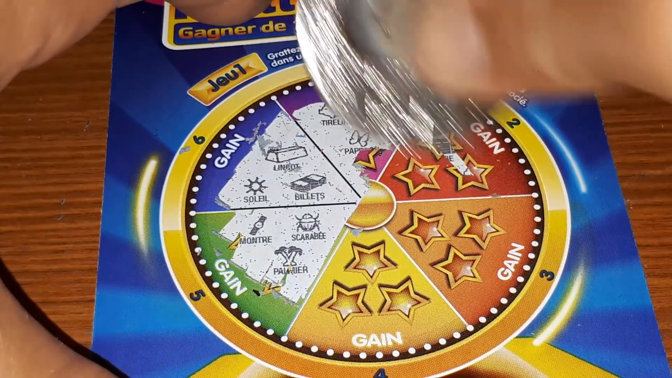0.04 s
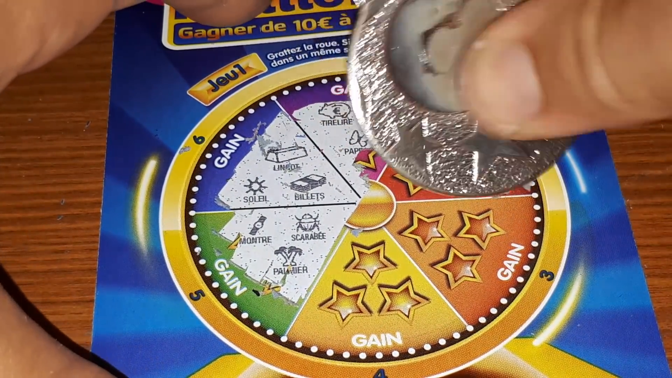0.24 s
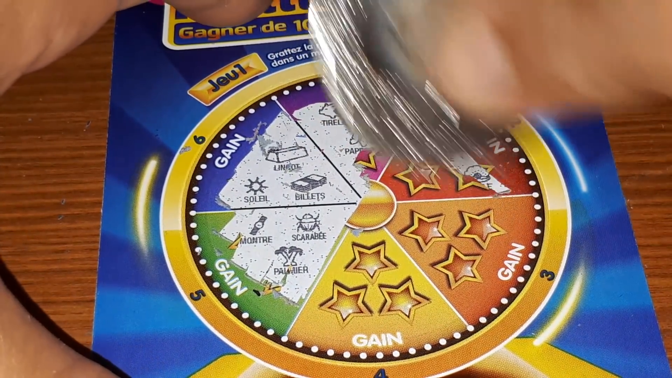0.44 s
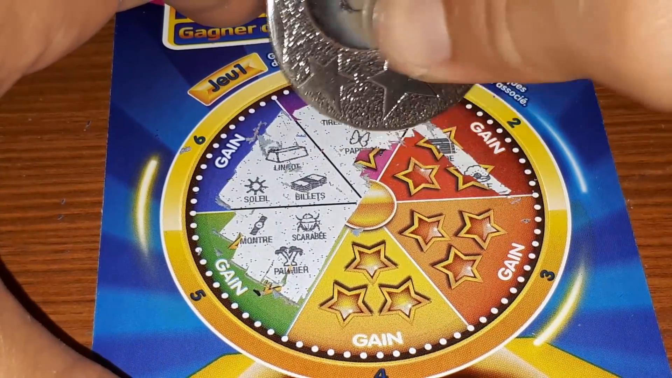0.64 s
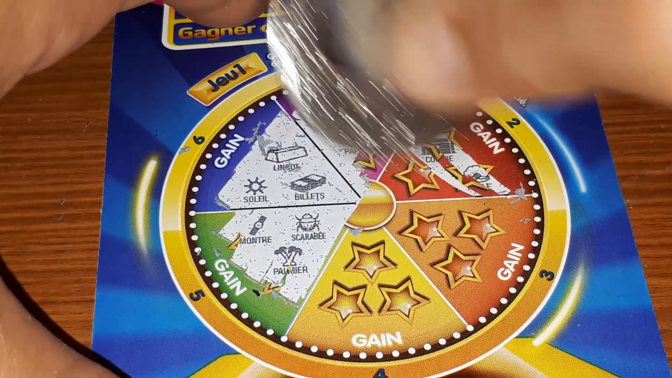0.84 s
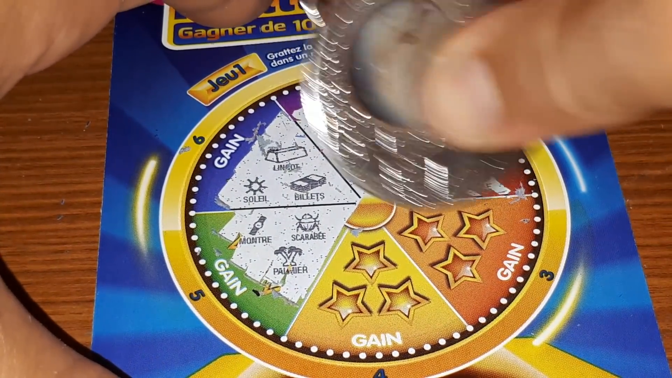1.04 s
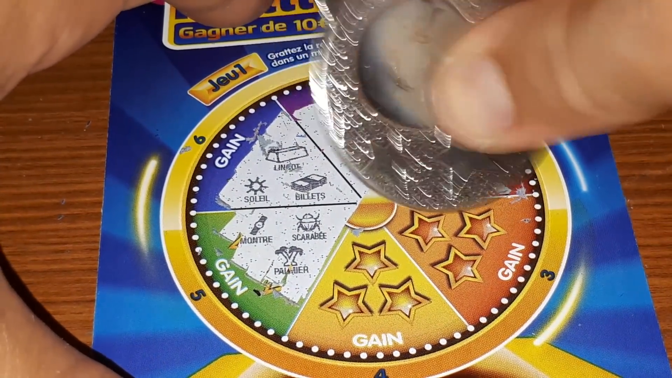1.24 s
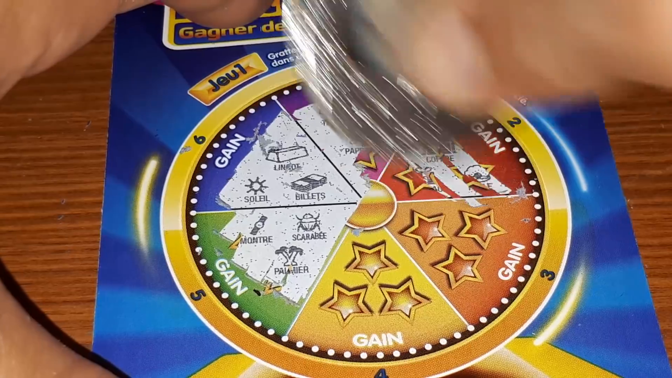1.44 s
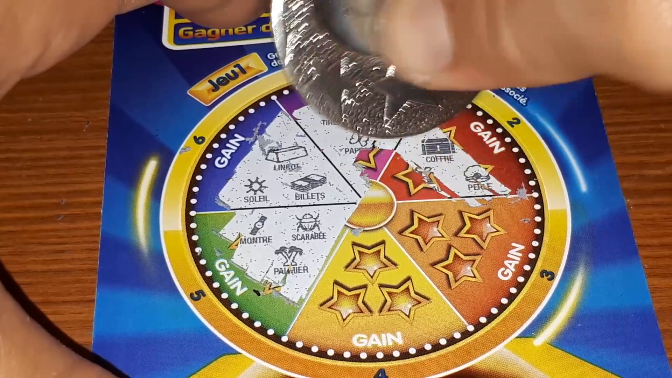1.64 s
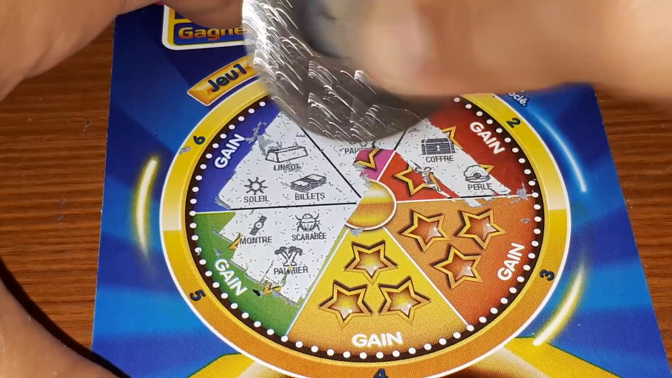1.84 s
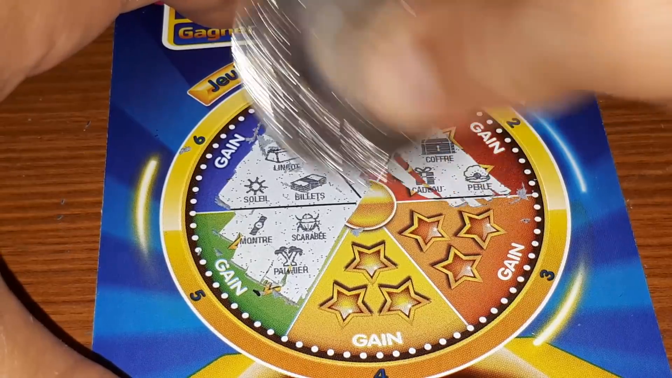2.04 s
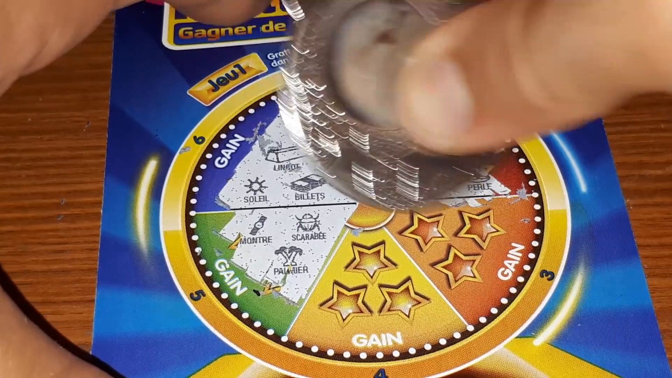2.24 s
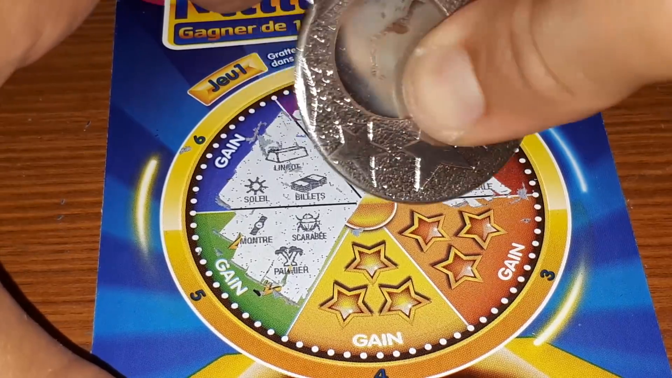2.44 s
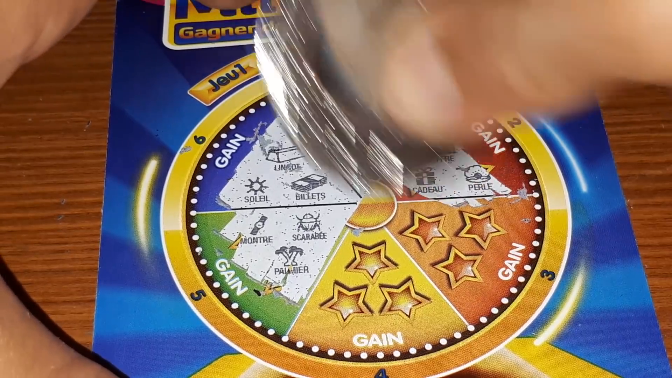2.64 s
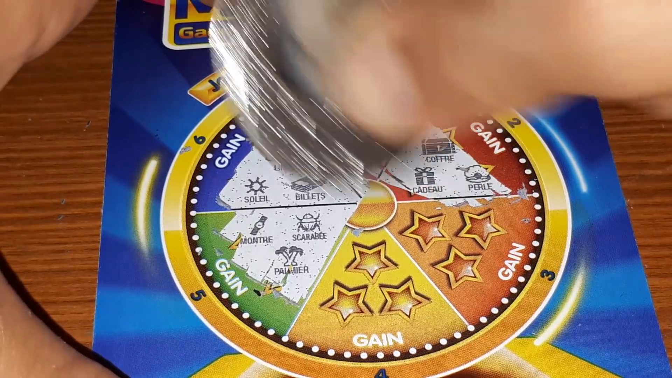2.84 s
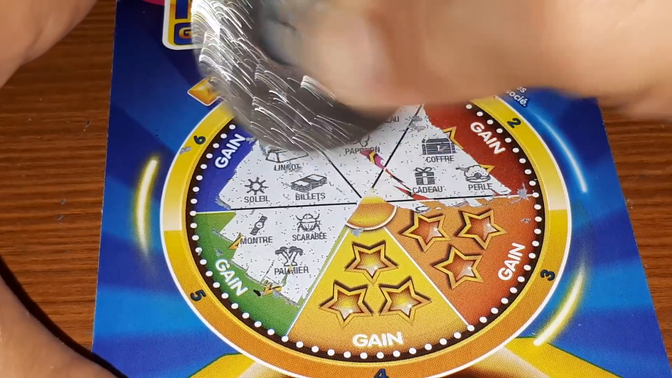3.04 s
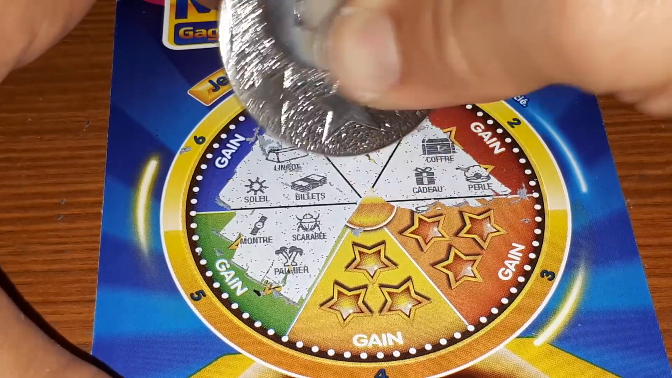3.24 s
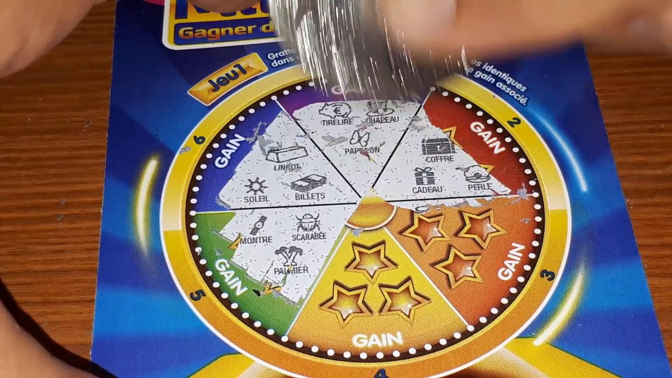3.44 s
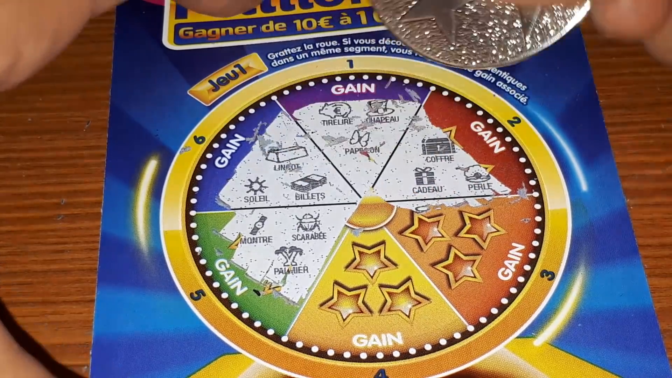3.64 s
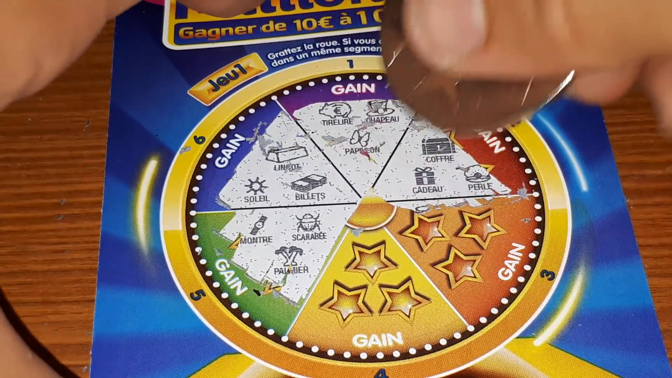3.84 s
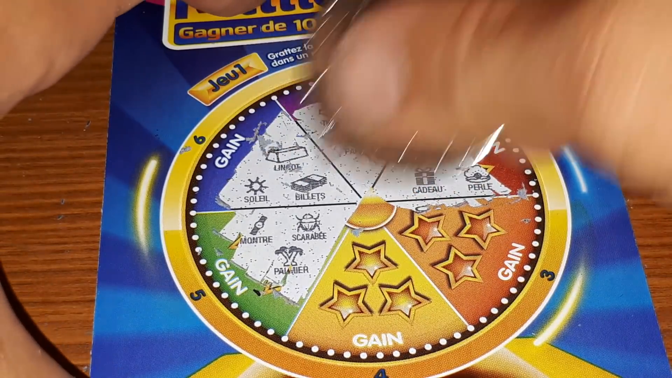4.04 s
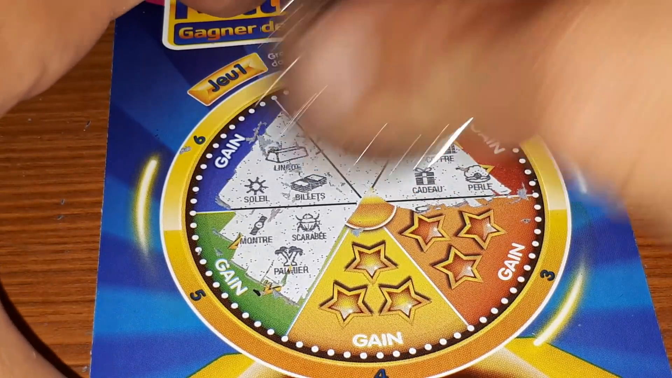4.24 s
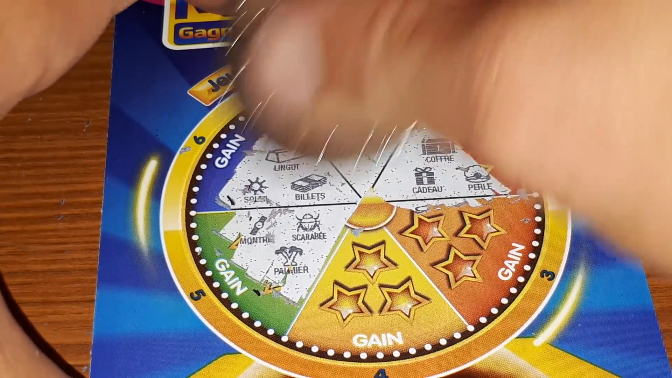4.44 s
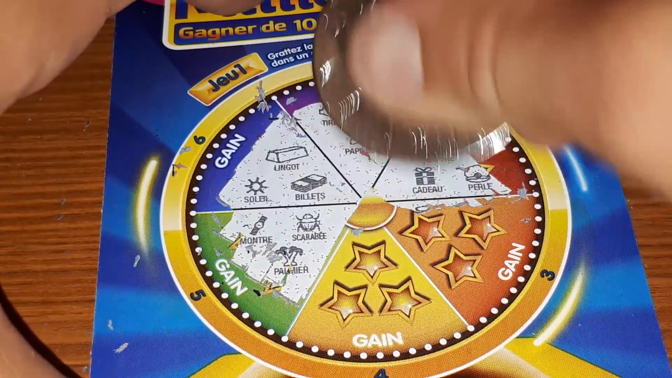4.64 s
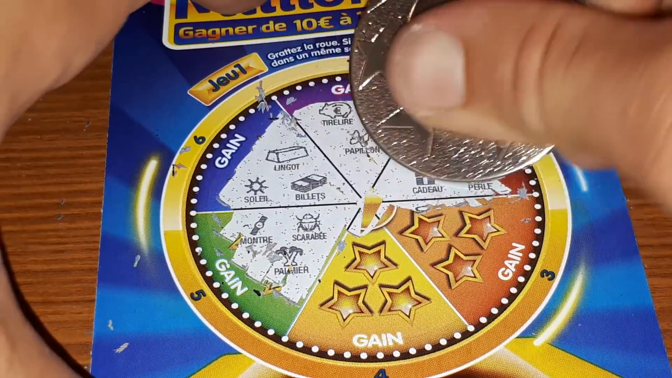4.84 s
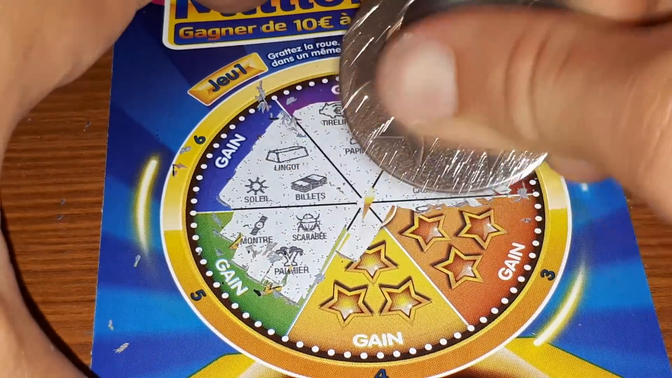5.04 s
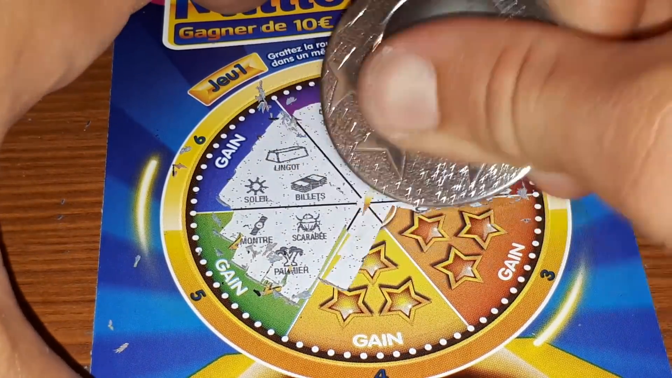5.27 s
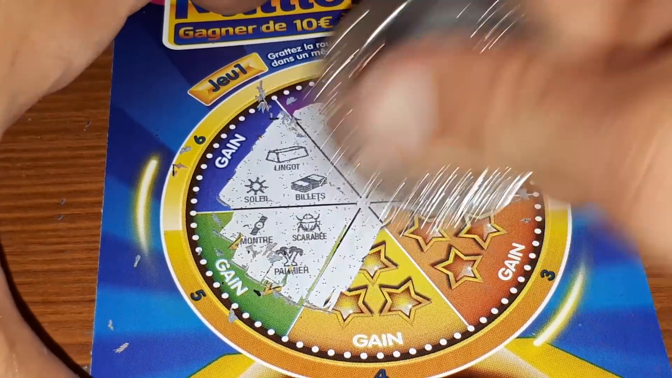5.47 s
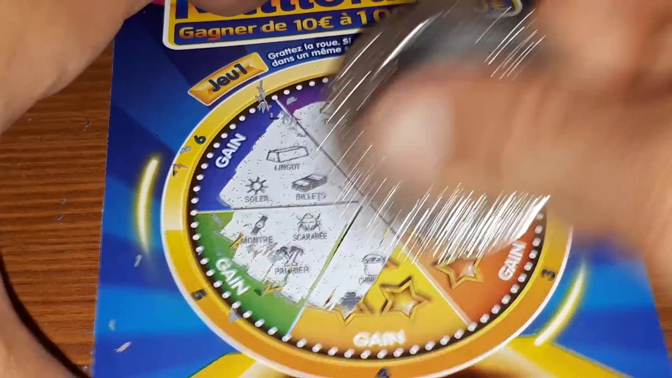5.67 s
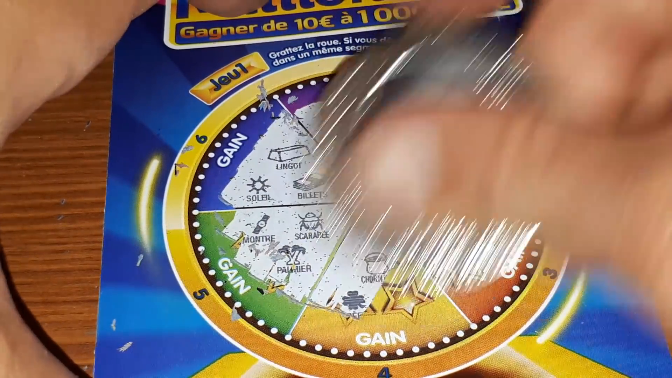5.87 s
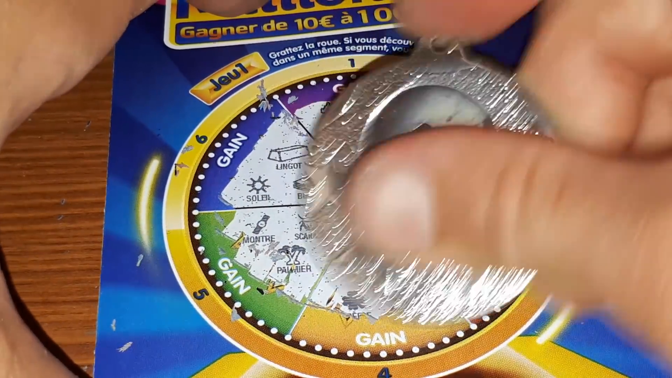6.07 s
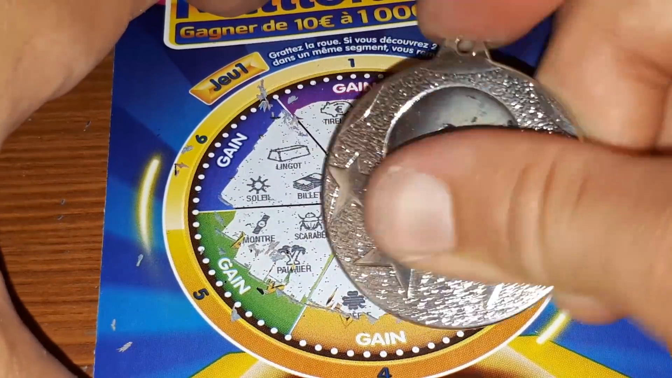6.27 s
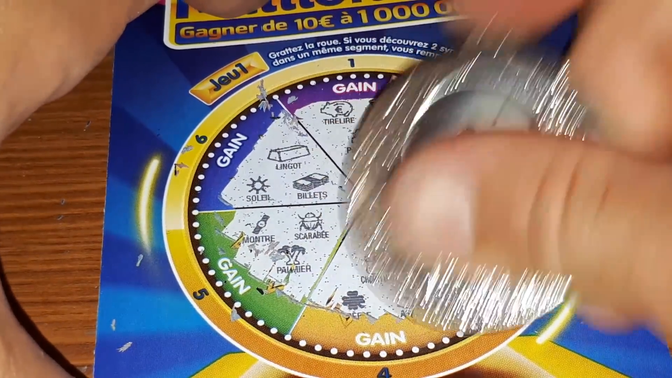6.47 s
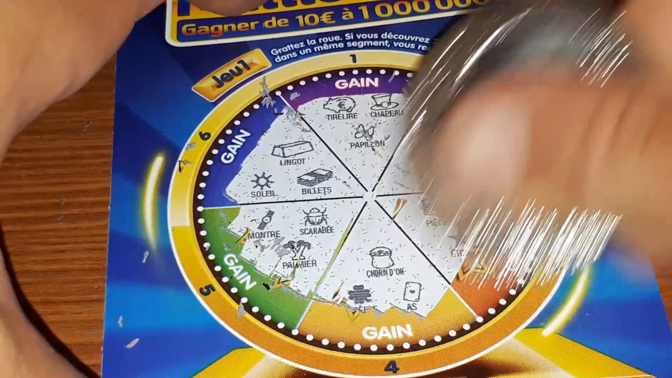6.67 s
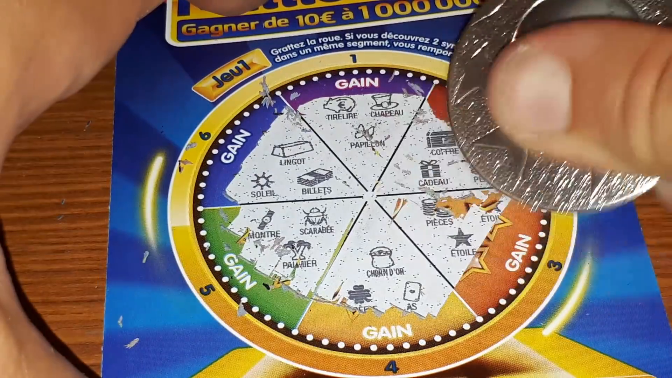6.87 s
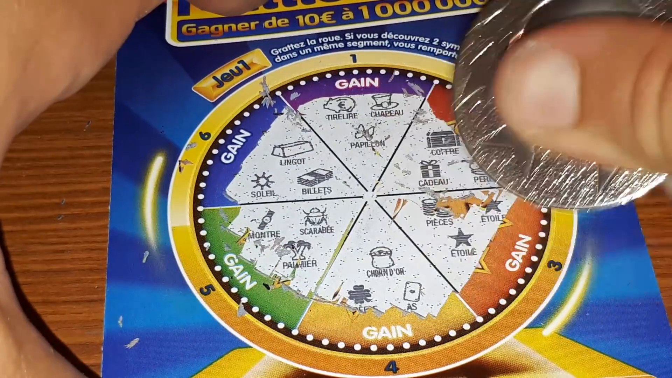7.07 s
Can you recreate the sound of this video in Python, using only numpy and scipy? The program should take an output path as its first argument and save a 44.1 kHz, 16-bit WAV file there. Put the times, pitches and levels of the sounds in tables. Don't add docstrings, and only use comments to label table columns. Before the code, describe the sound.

Rapid, regular coin scratching on a paper ticket: heavier, woodier pushes answer thinner, brighter pulls, with small clacks and crackles as the rim skips and flakes tear. After a short near-silent gap holding a faint tick and a solid knock on the table, strokes return, first duller, then crisper and more grating. Recorded very close in stereo, in a quiet room with faint low rumble.

```python
import sys
import numpy as np
from scipy import signal
from scipy.fft import rfft, irfft, next_fast_len
from scipy.io import wavfile
from scipy.ndimage import uniform_filter1d

SR = 44100
rng = np.random.default_rng(int(sys.argv[2]) if len(sys.argv) > 2 else 0)


def nominal_scale(level):
    x = np.asarray(level, float) / 20
    return 10 ** x


def pcm_store(signal):
    levels = np.round(np.clip(np.atleast_2d(signal), -1, 1) * 32767)
    wavfile.write(sys.argv[1], SR, levels.astype(np.int16).T)


N = 313551

# pitch_hz, level_db (per Hz)
HUSH = [(18, -44), (30, -14), (86, 0), (233, -12), (287, 1), (415, -18), (962, -19), (1390, -22),
        (8740, -32), (14800, -28.5), (16000, -31)]
# pitch_hz, side_minus_mid_db
WIDE = [(60, -7), (110, -27.5), (200, -28), (380, -20), (700, -16), (1290, -12.5), (2380, -5.5), (4400, -8),
        (8120, -5.5), (15000, -6)]
# pitch_hz, left_minus_right_db
LEAN = [(60, 1.0), (110, 1.0), (200, 0.5), (380, 0.5), (700, 1.5), (1290, .3), (2380, 1.0), (4400, 3.7),
        (8120, 2.5), (15000, 3.0)]

# pitch_hz, width_hz, far_level_db, near_level_db (far and near part of the ticket)
TABLE_MODES = [(92.6, 66, -8.5, -7.5), (130, 10.4, -8.5, -7), (164.3, 43, -3.5, 1), (198, 24, -4.5, 0.5),
               (220, 80, -4, -2), (294, 19.4, -1, -1), (332, 29, -4.5, -3), (418, 65, -4.5, -7),
               (475.8, 21.4, -3.5, -4), (561.4, 30, -3.5, -3.5), (617, 62, -8.5, -3), (676, 33, -5, 0.5),
               (737, 26.5, -6.5, -3.5)]
CARD_MODES = [(790, 46, -33, -18.5), (874.7, 28.8, -3, -7.5), (896.4, 91, 1, -1.5), (970.3, 57.4, 0, 0.5),
              (1030.5, 56, -1.5, 1), (1073.4, 80, -6, -1.5), (1117, 32, -21.5, -9.5), (1210, 79, -14, -9.5),
              (1264, 100, -18, -14), (1460, 51.3, -21.5, -19), (1472, 130, -23, -12.5),
              (1597.4, 58, -12.5, -12)]
PAPER_MODES = [(1790, 260, -9, -1.5), (1925, 58, -2.5, -3.5), (2119, 29, -8, -10.5), (2230, 52, -5.5, -8.5),
               (2240, 120, -3, -4), (2560, 360, -6, -3.5), (2820, 86, -9, -1), (2914, 52, -10, -6),
               (3227, 83, -9, -8.5), (3520, 360, -10, -5.5)]
COIN_MODES = [(3950, 240, -3, -10), (4140, 105, 8, -5), (4846, 145, -1.5, -10.5), (4530, 160, -6, -9)]
FIZZ_MODES = [(5160, 2300, 4, 10.5), (6500, 1350, -1.5, 4), (7740, 660, -2.5, 1), (8620, 1660, -18, -10)]
HISS_MODES = [(9376, 280, -3, 1.5), (10850, 800, -8, -8), (12020, 730, -8.5, 0.5), (14100, 1500, -5, -5),
              (15700, 1600, -13.5, 1.5)]
# pitch_hz, width_hz, level_db
THUD_MODES = [(146, 25, -3.5), (287, 34, 1.5), (325, 32, -2.5), (470, 20, -6.5), (636, 17, -15),
              (706, 24, -19), (906, 43, -3), (1030, 92, -18), (1106, 29, -18), (1586, 48, -14),
              (2200, 400, -51)]
# pitch_hz, width_hz, level_db
TICK_MODES = [(800, 250, -0.5), (1600, 200, -7.5), (2110, 270, -7), (2800, 24, 1.5), (2970, 10, 4.5),
              (3080, 70, 1), (3600, 250, -9)]

# time_s, level_db
WRIST_ROCK = [(0.0, -45), (0.2, -56), (0.65, -42), (0.77, -52), (1.39, -50), (1.78, -62), (1.94, -49),
              (2.47, -50.5), (3.01, -45.5), (3.46, -57), (3.8, -89.5), (4.12, -72), (5.07, -51),
              (5.52, -56.5), (5.9, -46.5), (6.3, -62), (6.65, -49.5), (7.11, -64)]
# start_s, level_db
LANDING = (3.943, -24)
# start_s, peak_db
FLAKES = [(0.1979, -50), (2.0727, -37), (2.7884, -39), (3.0184, -45), (3.225, -39), (4.293, -43),
          (4.5121, -46.5), (5.2834, -62), (5.3884, -36), (5.4545, -42), (.8604, -36), (1.1079, -40),
          (2.0627, -41), (2.7761, -37), (2.8729, -41), (4.7137, -46), (5.3617, -43), (5.5822, -43),
          (5.6875, -37), (6.0217, -42), (6.3555, -41), (6.57, -42)]
# start_s, peak_db, brightness_db
SNAGS = [(0.475, -45, -16), (0.992, -30, -15.5), (1.376, -18.5, -25), (1.486, -31, -19), (1.853, -38, -16),
         (2.641, -36, -21), (3.023, -29, -24), (5.134, -29, -12), (5.386, -27.5, -17), (5.949, -14, -16),
         (6.485, -28.5, -15), (6.617, -17, -14), (6.851, -13, -6.5)]
# start_s, peak_db, wood_db
JOLTS = [(0.179, -33, 0), (0.475, -28, -7), (0.721, -26.5, -6), (0.745, -23, -3), (0.991, -29, -1),
         (1.244, -30, -13), (1.261, -25, 0), (1.361, -23.5, -19), (1.376, -22.5, -25), (1.486, -24, -8),
         (1.6, -27, -12), (1.84, -28, -20), (1.853, -20, -20), (1.935, -29, -5), (2.23, -36, 4),
         (2.334, -26, -14), (2.41, -31, -3), (2.423, -27, -5), (2.566, -27, -13), (2.643, -31, 11),
         (2.675, -27.5, -5), (2.863, -30, -1.5), (2.875, -27, -4), (3.023, -25.5, -15), (3.085, -26.5, -7),
         (3.206, -27, -15), (4.49, -26, -14), (4.505, -25, -10), (4.693, -32, -15), (4.707, -26, -15),
         (4.815, -29, -26), (4.906, -25, -14), (5.134, -23, -15), (5.145, -21.5, -16), (5.354, -24.5, -17),
         (5.385, -22, -14), (5.566, -27, -17), (5.894, -30, -20), (6.015, -28, -12), (6.484, -24, -23),
         (6.955, -28, -7), (7.04, -31, -17)]

# start_s, length_s, pressure_db, coating_bite_db, bite_lag_ms
PUSH_FAR = [(0.188, 0.058, -41.5, -50, 6.5), (0.467, 0.049, -31.5, -58.5, -2),
            (0.732, 0.041, -32.5, -62, 2), (0.984, 0.033, -35.5, -60.5, 4),
            (1.236, 0.038, -32.3, -62.5, 11), (1.474, 0.038, -31.5, -64, 6), (1.706, 0.048, -36.5, -67, 8),
            (1.93, 0.054, -36, -53, 12), (2.168, 0.059, -39, -58.5, 1), (2.415, 0.042, -33.5, -64.5, 2),
            (2.651, 0.047, -33.6, -66, 2), (2.865, 0.044, -36, -49.5, 3.5), (3.085, 0.039, -34, -53, 8),
            (3.303, 0.067, -44, -69.5, 19)]
PULL_FAR = [(0.036, 0.06, -39.5, -54.5, 12.5), (0.316, 0.06, -38, -55.5, 2), (0.582, 0.048, -33, -57.5, 8),
            (0.839, 0.057, -36.5, -46.5, 10.5), (1.092, 0.059, -38.5, -48.5, 6),
            (1.353, 0.044, -31, -53, 2.5), (1.587, 0.039, -35, -53.5, 4), (1.839, 0.029, -27.5, -63.5, 13),
            (2.056, 0.044, -35.5, -44.5, 4), (2.297, 0.045, -32.5, -53, 2),
            (2.545, 0.036, -31.5, -59.5, -1), (2.758, 0.043, -35, -46.2, 10), (2.98, 0.053, -36.5, -49, -4),
            (3.199, 0.035, -36, -52.5, 5)]
PUSH_NEAR = [(4.038, 0.046, -40.5, -66.5, 11), (4.252, 0.052, -35.5, -63, 0),
             (4.47, 0.044, -32.9, -64.5, 16), (4.689, 0.041, -36, -55.5, 24),
             (4.9, 0.051, -33.5, -49.5, 16.5), (5.127, 0.04, -31, -47, 20.5),
             (5.347, 0.042, -30.5, -47.1, 15.5), (5.568, 0.041, -31.3, -48, 18),
             (5.785, 0.054, -35.5, -49.8, 7), (6.001, 0.067, -39.5, -48.1, 4),
             (6.236, 0.051, -38, -49, 2.5), (6.466, 0.041, -35.5, -49.5, 8.5),
             (6.69, 0.057, -36, -60.5, 15), (6.931, 0.049, -37.0, -55.1, 6)]
PULL_NEAR = [(4.149, 0.043, -43.5, -83, 2), (4.368, 0.049, -44.5, -80.5, 8), (4.576, 0.048, -34, -70, 12),
             (4.792, 0.04, -36.5, -50.5, -0.5), (5.021, 0.044, -38.5, -49.5, 1),
             (5.255, 0.04, -34.5, -62, 10), (5.468, 0.048, -33.5, -60.2, -12),
             (5.678, 0.061, -39.5, -44.5, -4.5), (5.885, 0.064, -37, -48, 12.5),
             (6.116, 0.071, -38.5, -44.5, 4), (6.347, 0.07, -40, -47, -2), (6.572, 0.067, -40, -45.0, 2),
             (6.801, 0.061, -35.5, -45.0, 14), (7.039, 0.068, -36.5, -50.5, 1.5)]
WOOD_DB = [
    (.4, -0.5, -0.9, 1.5, -1.5, -0.7, -1, -0.2, 1.9, -0.11, .1, -1.5, .1, 0.5),
    (-.4, -0.5, 0.7, -.8, 3, -4, -.1, -0.5, -1.6, .4, -2, -1.9, -2, -3),
    (0.73, -0.6, -1.2, -1.5, -1.1, 0, 1, 0, -1.4, .6, 1.8, -1.8, -2.6, 2.5),
    (-1.1, 4, -2, -4.6, .1, 1, -0.5, 0.5, -.8, -.1, -2.5, 0.078, -0.5, 2),
]
# push_far_db, pull_far_db, push_near_db, pull_near_db
TABLE_DB = (-33.4, -45, -38.5, -50.5)
COIN_DB = (-53, -52.5, -56.5, -52)
RASP_DB = (-51.5, -55, -52.5, -54)
# far_db_per_db, near_db_per_db
COIN_PER_BITE = (1, 1.09)
RASP_PER_BITE = (0.85, 0.92)
# push_far_s, pull_far_s, push_near_s, pull_near_s
TABLE_MORE_S = (.03, .034, .026, .06)
TABLE_LAG_S = (-.011, .003, -0.0046, 0.0046)
# far_10db, near_10db
# and far_s, near_s
SWELL_TENS_DB = (-0.14, 0.2)
SWELL_EARLY_S = (-0.00087, 0.0038)
# far_db, near_db
FIZZ_DB = (-1.5, -0.95)
HISS_DB = (-3, -5.5)

MOVE_S = 4.3
TICK_S, TICK_DB = 3.647, -53


def evened(x):
    return x / np.sqrt(np.mean(x ** 2) + 1e-20)


def coloured(x, points, share=1):
    curve_hz, curve_db = np.transpose(points)
    size = next_fast_len(N)
    hz = np.fft.rfftfreq(size, 1 / SR)
    db = np.interp(np.log(hz + 1), np.log(curve_hz + 1), curve_db)
    return irfft(rfft(x, size) * nominal_scale(share * db))[..., :N]


def swings(modes, drift):
    hz, width = np.transpose(modes)[:2, :, None]
    t = np.arange(min(6144, round(2.5 * SR / width.min()))) / SR
    hz = hz * (1 + drift * rng.standard_normal(hz.shape))
    decay = np.sqrt(width) * np.exp(-np.pi * width * t)
    onset = 1 - np.exp(-t / 0.00017)
    return decay * np.sin(2 * np.pi * hz * t) * onset


def blend(db, tones):
    return nominal_scale(db) * (-1) ** np.arange(len(tones)) @ tones


def body(force, modes, vary_db, wander_s, drift=0.011):
    tunings = [swings(modes, drift) for _ in range(4)]
    step = max(round(wander_s * SR), 1000)
    out = np.zeros((2, N + 6143))
    chance = rng.standard_normal((N // 1000 + 1, len(modes)))
    for k, a in enumerate(range(0, N, step)):
        place_db = np.transpose(modes)[2 + (a > MOVE_S * SR)]
        h = blend(place_db + vary_db * chance[k], tunings[k % 4])
        part = signal.fftconvolve(force[:, a:a + step], h[None] / np.linalg.norm(h), axes=1)
        out[:, a:a + part.shape[1]] += part
    return out[:, :N]


def knocks(times, dbs, modes, rattle_s, lead=0):
    out, t = np.zeros((2, N + 900)), np.arange(900) / SR
    for s, db in zip(times, dbs):
        rattle = (rng.standard_normal(900) + lead * (t == 0)) * np.exp(-t / rattle_s)
        ring = blend([m[-1] for m in modes], swings(modes, 0.0036))
        h = np.convolve(ring, rattle)[:6144]
        part = out[:, round(s * SR):][:, :len(h)]
        part += nominal_scale(db) * (h / abs(h).max())[:part.shape[1]]
    return out[:, :N]


def hush():
    a, b = rng.standard_normal((2, N))
    return nominal_scale(-69) * evened(coloured(np.array([a + .3 * b, a - .3 * b]), HUSH))


def rumble():
    busy = (abs(np.arange(N) / SR - 3.7) > .25) * 0.65 + 0.28
    band = signal.butter(2, [25, 90], "band", fs=SR, output="sos")
    low = signal.sosfilt(band, rng.standard_normal((2, N)))
    shake = evened(low[0] + .12 * low * [[0], [1]])
    return nominal_scale(-77.5) * shake * uniform_filter1d(busy, 4000)


def room(x):
    t60_s, first_s = .33, .006
    t = np.arange(SR // 2) / SR
    taps = rng.choice([-1., 1.], (2, len(t))) * (rng.random((2, len(t))) < .05) * (t > first_s)
    taps = taps * nominal_scale(-60 * t / t60_s)
    return signal.oaconvolve(x[None], taps / np.linalg.norm(taps[0]), axes=1)[:, :N]


def fingernail_tick():
    snap = knocks([TICK_S - .001], [TICK_DB - 5], FIZZ_MODES + HISS_MODES, 0.0013)
    return snap + knocks([TICK_S], [TICK_DB], TICK_MODES, .002)


def landing():
    s, db = LANDING
    wood = knocks([s, s + .006, s + .013], [db + 2.0, db + 2.0, db - 2.5], THUD_MODES, 0.0014, 9.4)
    snap = knocks([s - .001], [db - 26], FIZZ_MODES + HISS_MODES, 0.0013)
    return wood + snap + knocks([s], [db - 35], PAPER_MODES + COIN_MODES, .003)


def flakes():
    s, db = np.transpose(FLAKES)
    return knocks(s, db - 2.5, FIZZ_MODES + HISS_MODES, 0.0046)


def snags():
    s, db, bright_db = np.transpose(SNAGS)
    clack = knocks(s, db - 3.5, [(986, 110, 7), (1570, 280, 4.0), (1980, 440, -3.5)], 0.006, 5.0)
    crack_modes = [(2700, 500, 2), (4480, 380, 3), (6000, 2700, 3.5)]
    crack = knocks(s, db + bright_db - 1.5, crack_modes, .003, 3.5)
    tick = knocks(s, db + 1.6 * bright_db - 1.5, FIZZ_MODES + HISS_MODES, .0005)
    return clack + crack + tick


def jolts():
    s, db, wood_db = np.transpose(JOLTS)
    card_modes = [(892, 75, 0), (1022, 91, 1.3), (1194, 250, -10.5), (1594, 90, -12)]
    wood_modes = [(300, 60, 0.45), (480, 70, -2.4), (690, 130, -1.5)]
    card = knocks(s, db - 1.5, card_modes, 0.0044, 3.9)
    return card + knocks(s, db + wood_db - 6, wood_modes, 0.0035, 3.5)


def strokes(starts, lengths, dbs, stretch, flat, swell_tens_db=0, skirt_db=-60, abrupt=1):
    out = np.zeros(N)
    for s, length, db, swell in zip(starts, lengths, dbs, swell_tens_db + 0 * starts):
        first = max(round((s - 2 * length) * SR), 0)
        at = np.arange(first, min(round((s + 3 * length) * SR), N))
        along = (at / SR - s - length / 2) / (stretch * length)
        edge = flat * np.where(along < 0, abrupt, 1)
        hump = nominal_scale(10 * swell * np.clip(along, -1, 1)) * np.exp(-abs(along) ** edge)
        skirt = nominal_scale(skirt_db) * np.exp(-((along - .4) / 2.54) ** 2)
        out[at] += nominal_scale(db) * (hump + skirt)
    return out


def slips(per_s, spread_db, judder_db, judder_s, steady_s):
    size = nominal_scale(spread_db * np.minimum(rng.exponential(1, N), 4)) * (rng.random(N) < per_s / SR)
    judder = evened(uniform_filter1d(rng.standard_normal(N), max(round(judder_s * SR), 2)))
    train = size * nominal_scale(judder_db * judder) * rng.standard_normal((2, N))
    power = abs(uniform_filter1d(train ** 2, round(steady_s * SR), axis=1))
    return train / np.sqrt(power + 0.00103)


def wrist_rock():
    level_db = np.interp(np.arange(N) / SR, *np.transpose(WRIST_ROCK))
    return body(nominal_scale(level_db) * slips(400, 2.1, 1.7, 0.018, 0.15), TABLE_MODES[:7], 4.8, .08)


def crumb_drag():
    lift_s, touch_s, near_more_db = 3.435, 4.7, 3.5
    t = np.arange(N) / SR
    touching = 1. * ((t < lift_s) | (t > touch_s))
    return nominal_scale(-72.5) * uniform_filter1d(touching * nominal_scale(near_more_db * (t > touch_s)), size=4000)


def shaken_wood_and_card(s, length, press_db, harder_db, kind):
    heavy = slips(1500, 2.43, 0.69, 0.0053, 0.027)
    table_length = length + np.take(TABLE_MORE_S, kind)
    table_s = s + length / 2 + np.take(TABLE_LAG_S, kind) - table_length / 2
    table_db = np.take(TABLE_DB, kind) + 0.68 * harder_db + np.ravel(WOOD_DB)
    table_push = strokes(table_s, table_length, table_db - .4, 0.52, 3.8)
    card_push = strokes(s - .004, length, press_db - 1.8, 0.61, 3.35)
    return body(heavy * table_push, TABLE_MODES, 2.8, .045) + body(heavy * card_push, CARD_MODES, 1.9, .04)


def torn_coating(s, length, bite_db, lag_ms, harder_db, kind):
    place = kind // 2
    deeper_db = bite_db + 54
    middle_s = s + length / 2 + lag_ms / 1000
    length = 0.016 + 0.69 * length + .0016 * np.maximum(-deeper_db, 0)
    s = middle_s - length / 2 - np.take(SWELL_EARLY_S, place)
    swell = np.take(SWELL_TENS_DB, place)
    break_in = 1.9

    rasp_db = np.take(RASP_DB, kind) + np.take(RASP_PER_BITE, place) * deeper_db + 0.3 * harder_db
    coin_db = np.take(COIN_DB, kind) + np.take(COIN_PER_BITE, place) * deeper_db
    coin_db = coin_db + 2.5 * (s - 2.03) * (1 - place)
    fizz_db = bite_db + np.take(FIZZ_DB, place)
    hiss_db = bite_db + np.take(HISS_DB, place)
    hiss_db = hiss_db + 1.8 * (s - 5.7) * place

    fine = slips(7000, 1.2, 1.25, 0.0094, 0.082)
    rasp_drive = crumb_drag() + strokes(s, length, rasp_db - .5, 0.54, 2.3, swell, -22, break_in)
    coin_drive = strokes(s, length, coin_db, 0.48, 2.55, swell, -23, break_in)
    fizz_drive = strokes(s, length, fizz_db, 0.45, 2.44, swell, -16.0, break_in)
    hiss_drive = strokes(s, length, hiss_db, 0.45, 2.15, swell, -17.5, break_in)
    rasp = body(fine * rasp_drive, PAPER_MODES, 2.3, .035, 0.026)
    coin = body(fine * coin_drive, COIN_MODES, 2.6, .05, 0.0046)
    fizz = body(fine * fizz_drive, FIZZ_MODES, 2.7, .04, 0.047)
    hiss = body(fine * hiss_drive, HISS_MODES, 2.4, .04, 0.015)
    return rasp + coin + fizz + hiss


def scratch():
    tables = PUSH_FAR, PULL_FAR, PUSH_NEAR, PULL_NEAR
    s, length, press_db, bite_db, lag_ms = np.concatenate(tables).T
    kind = np.repeat(np.arange(len(tables)), [len(rows) for rows in tables])
    harder_db = press_db + 36
    shaken = shaken_wood_and_card(s, length, press_db, harder_db, kind)
    return shaken + torn_coating(s, length, bite_db, lag_ms, harder_db, kind) + wrist_rock()


def scene():
    near = fingernail_tick() + landing() + flakes() + snags() + jolts() + scratch()
    mid, other = signal.sosfilt(signal.butter(4, 112, "high", fs=SR, output="sos"), near)
    dull = signal.lfilter(*signal.butter(1, 5000, fs=SR), mid)
    wet_mid, wet_side = nominal_scale(-13.5) * room(dull)
    side = coloured(other + wet_side, WIDE) * nominal_scale(.1)
    mid = mid + wet_mid
    left = coloured(mid + side, LEAN, share=0.18)
    right = coloured(mid - side, LEAN, share=-0.86)
    return np.array([left, right]) + hush() + rumble()


def band_limit(x):
    return signal.sosfilt(signal.butter(12, 16550, fs=SR, output="sos"), x)


def record(dry):
    edge = signal.firwin(1023, 15830, window=("kaiser", 9), fs=SR)
    mix = signal.oaconvolve(dry, edge[None], "same")
    return band_limit(mix)


dry = scene()
out = record(dry)
pcm_store(out)
```